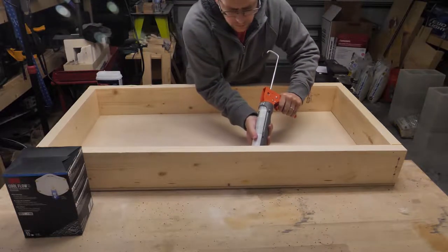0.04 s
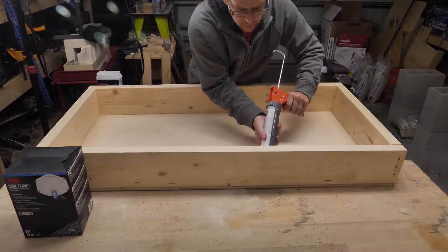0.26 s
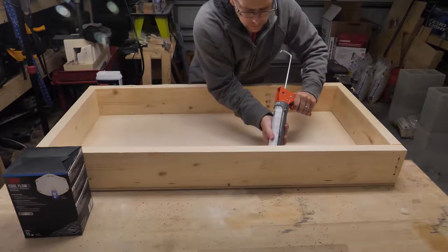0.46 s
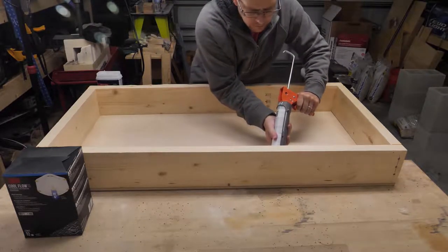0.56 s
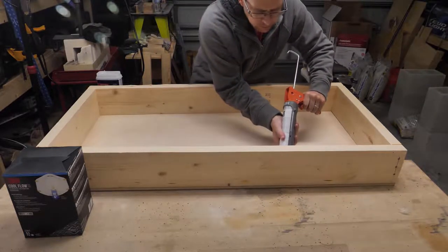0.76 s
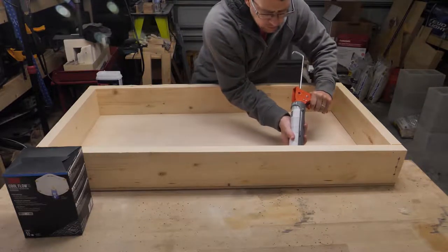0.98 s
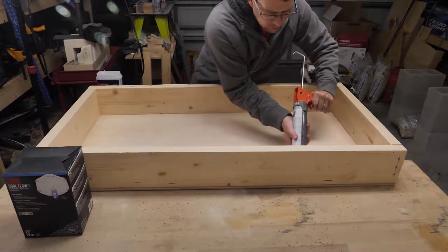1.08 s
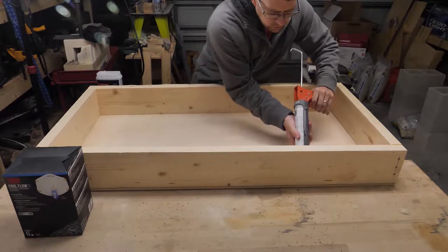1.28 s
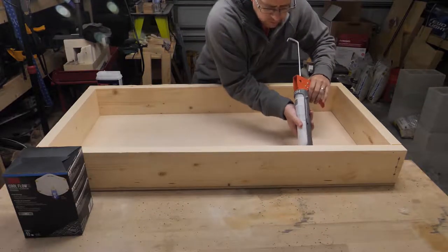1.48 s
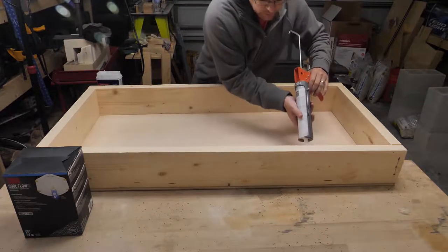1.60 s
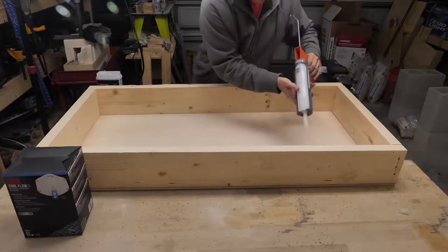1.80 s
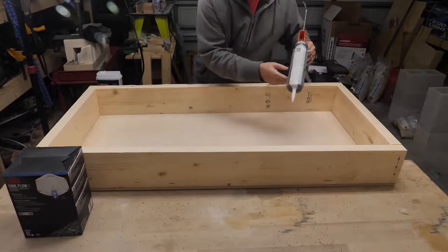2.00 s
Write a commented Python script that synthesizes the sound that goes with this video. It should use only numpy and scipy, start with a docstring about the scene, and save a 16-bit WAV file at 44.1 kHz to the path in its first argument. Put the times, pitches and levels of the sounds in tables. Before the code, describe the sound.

Sharp metal clicks from a caulking gun, with faint scraping on wood and soft knocks.

```python
"""A caulking gun lays a bead inside a wooden frame on a garage workbench. Over faint room noise the
nozzle drags along the wood by stick-slip friction. At 0.2 s the steel catch snaps, rings and rattles.
The nozzle snags on the grain, the boards groan once, and just after 1 s the trigger clacks back.
From 1.26 s the gun is lifted off with soft knocks and two spring ticks; the scraping fades, then
returns faintly at the end. The garage answers each sound with a short reverberation."""
import sys
import numpy as np
from scipy import signal
from scipy.fft import rfft, irfft, next_fast_len
from scipy.io import wavfile

SR = 44100
rng = np.random.default_rng(int(sys.argv[2]) if len(sys.argv) > 2 else 0)


def log_audio(samples):
    """Write samples as a 16-bit WAV file to the path given in sys.argv[1]."""
    # one column per channel
    frames = np.atleast_2d(samples).T
    # limit to full scale, then quantise
    limited = np.clip(frames, -1, 1)
    pcm = np.round(limited * 32767).astype(np.int16)
    wavfile.write(sys.argv[1], SR, pcm)


N = 90404
HIT_SAMPLES = 24000


def amp(db):
    """Amplitude ratio of a level in decibels."""
    return 10 ** (np.asarray(db) / 20)


def unit_rms(x):
    """Normalisation to unit mean power."""
    return x / np.sqrt(np.mean(x ** 2) + 1e-20)


def at_frequency(points, hz):
    """Interpolation on a logarithmic frequency axis."""
    f, value = np.transpose(points)
    return np.interp(np.log(hz + 1), np.log(f + 1), value)


def envelope(points):
    """Amplitude envelope, linear in decibels between points."""
    return amp(np.interp(np.arange(N) / SR, *np.transpose(points)))


def add(mix, start_s, sound):
    """Superposition of a delayed sound on the mix."""
    part = mix[round(start_s * SR):][:len(sound)]
    part += sound[:len(part)]


def colour(x, spectrum):
    """Linear filtering by multiplication of spectra."""
    size = next_fast_len(len(x) + 2048, True)
    gain = amp(at_frequency(spectrum, np.fft.rfftfreq(size, 1 / SR)))
    return irfft(rfft(x, size) * gain, size)[:len(x)]


def noise(spectrum, size=HIT_SAMPLES):
    """Filtered Gaussian noise of unit power."""
    return unit_rms(colour(rng.standard_normal(size), spectrum))


def decay(t60, hold_s=0):
    """Exponential damping: after a hold, a fall of 60 dB in t60 seconds."""
    return np.exp(-np.log(1000) * np.maximum(np.arange(HIT_SAMPLES) / SR - hold_s, 0) / t60)


# spectrum of the room noise (f/Hz, level/dB)
AIR_SPECTRUM = [(25, -22.5), (60, -24), (105, -5.5), (240, 1), (430, -12), (850, -16), (1300, -19),
                (1700, -16), (2500, -16), (5000, -21), (11500, -21.5), (15000, -29), (16000, -43.5)]
# stereo width of the room, as gain of the side signal (f/Hz, level/dB)
SIDE_SPECTRUM = [(100, -19.5), (300, -24), (700, -12), (1400, -4.5), (2600, -8), (5000, -4.5), (9500, -9.5),
                 (14000, -1)]
def air():
    """Stationary noise: low rumble and faint hiss, partly coherent between left and right."""
    mid = noise(AIR_SPECTRUM, N)
    side = colour(noise(AIR_SPECTRUM, N), SIDE_SPECTRUM)
    return amp(-60.5) * np.array([mid + side, mid - side])


def slips(spectrum, per_second=1400, spread_db=3):
    """Stick-slip friction: random impulses of uneven size, filtered by what they shake."""
    strength = amp(spread_db * np.minimum(rng.exponential(1, N), 3.5))
    sign = rng.choice([-1, 1], N)
    slipping = rng.random(N) < per_second / SR
    return unit_rms(colour(strength * sign * slipping, spectrum))


# hollow rubbing of the nozzle on the boards: envelope (t/s, level/dB), spectrum (f/Hz, level/dB)
RUB_ENVELOPE = [(0, -49.5), (.3, -48.5), (.52, -48), (.65, -51), (.8, -47), (.9, -44.5), (1.0, -45),
                (1.07, -55), (1.2, -55), (1.3, -62), (1.39, -58), (1.52, -65.5), (1.68, -73), (1.9, -72),
                (2.05, -61.5)]
RUB_SPECTRUM = [(60, -37), (100, -7), (150, -7.5), (200, -10.5), (290, -2.5), (350, 1), (450, 0.5),
                (545, -6), (630, 1), (725, 0), (810, -8), (910, -1), (1060, -16.5), (1400, -15),
                (2500, -28.5), (6000, -43)]
# gritty scraping of gun and hands: envelope (t/s, level/dB), spectrum (f/Hz, level/dB)
GRIT_ENVELOPE = [(0, -55), (.2, -58), (.5, -54), (.65, -60.5), (.8, -52.5), (.9, -52.5), (1.0, -50.5),
                 (1.15, -55.5), (1.24, -60), (1.29, -52), (1.34, -58.5), (1.42, -52.5), (1.56, -64.5),
                 (1.66, -79), (1.77, -63.5), (1.87, -76.5), (1.98, -61.5), (2.05, -60)]
GRIT_SPECTRUM = [(60, -34.5), (200, -15), (800, -6), (1400, 4), (1850, -5.5), (2250, -1), (3200, -7.5),
                 (4500, -10), (6500, -22.5), (14000, -20.5), (16000, -40)]
def scraping():
    """Sliding friction: dense slips merge into a hollow rub and a brighter grit."""
    rub = envelope(RUB_ENVELOPE) * slips(RUB_SPECTRUM)
    grit = envelope(GRIT_ENVELOPE) * slips(GRIT_SPECTRUM)
    return rub + grit


def damped_mode(hz, db, t60, linewidth_hz=18.7):
    """Free vibration: the phase wanders as the loose part shifts on its seat, broadening the line."""
    drift = np.cumsum(rng.standard_normal(HIT_SAMPLES)) * np.sqrt(2 * np.pi * linewidth_hz / SR)
    cycles = hz * np.arange(HIT_SAMPLES) / SR + rng.random()
    return amp(db) * decay(t60) * np.sin(2 * np.pi * cycles + drift)


def steel_impact(contacts, modes, spectrum, crack_db, crack_t60, rattle_db, rattle_hold_s, rattle_t60):
    """Impact excitation: each contact cracks and rings the modes; the last leaves a loose rattle."""
    out = np.zeros(N)
    for start_s, db in contacts:
        ring = sum(damped_mode(*mode) for mode in modes)
        crack = amp(crack_db) * noise(spectrum) * decay(crack_t60)
        add(out, start_s, amp(db) * (ring + crack))
    rattle = amp(rattle_db) * noise(spectrum) * decay(rattle_t60, rattle_hold_s)
    add(out, contacts[-1][0], rattle)
    return out


# contacts of the catch plate with the rod (t/s, level/dB)
CATCH_CONTACTS = [(.2083, 0.5), (.2094, -2), (.2124, -3.5)]
# normal modes of plate and rod (f/Hz, level/dB, T60/s)
CATCH_MODES = [(2230, -28, .02), (2610, -28.5, 0.022), (2800, -38, 0.18), (3620, -38.5, 0.29),
               (3675, -37.5, 0.19), (6019, -55, 0.31), (6340, -41, .45), (8300, -24, .025),
               (8480, -36, .25), (9318, -20.5, 0.02), (9580, -31, 0.22), (9841, -36.5, .32),
               (10010, -12.5, 0.024), (11870, -24.5, 0.022), (13600, -27, .025)]
# spectrum of their crack and rattle (f/Hz, level/dB)
CATCH_SPECTRUM = [(60, -50), (900, -33), (1250, -10.5), (1900, -9.5), (2300, 0), (3200, -2.5), (3700, 1.5),
                  (4400, -5), (6100, 3.5), (7100, -5.5), (8300, 3), (8950, -10), (9750, 12), (10500, -3.5),
                  (13000, -1.5), (16000, -7.5)]
def catch():
    """Impact with rebound: the catch plate snaps on the rod and excites inharmonic modes."""
    return steel_impact(CATCH_CONTACTS, CATCH_MODES, CATCH_SPECTRUM, crack_db=-14.5, crack_t60=0.015,
                        rattle_db=-31.5, rattle_hold_s=0.063, rattle_t60=0.16)


# snags of the nozzle (t/s, level/dB) and their spectrum (f/Hz, level/dB)
SNAGS = [(0.5362, -41), (.6148, -45), (.6428, -46), (0.6949, -41.5), (.7186, -51), (0.757, -41),
         (.7984, -47), (0.846, -40)]
SNAG_SPECTRUM = [(200, -24), (900, 6), (1500, 5), (2300, 0), (3200, -22), (5000, -20), (8000, -30),
                 (16000, -46)]
def snags():
    """Friction transients: the nozzle catches on the grain in heavily damped bursts."""
    out = np.zeros(N)
    for start_s, db in SNAGS:
        add(out, start_s, amp(db) * noise(SNAG_SPECTRUM) * decay(t60=0.023))
    return out


# narrow response of the boards (f/Hz, level/dB)
GROAN_SPECTRUM = [(130, -55), (205, -23), (260, 9), (315, -6), (520, -52)]
def groan(peak_s=0.965, half_width_s=0.042):
    """Resonance: the boards groan under the nozzle in one swell of low narrow-band noise."""
    swell = np.exp(-((np.arange(N) / SR - peak_s) / half_width_s) ** 2)
    return amp(-44.5) * swell * noise(GROAN_SPECTRUM, N)


# contacts of the trigger with its frame (t/s, level/dB)
TRIGGER_CONTACTS = [(1.0421, 0), (1.0434, -2.5), (1.0462, -3.5)]
# normal modes of trigger and frame (f/Hz, level/dB, T60/s)
TRIGGER_MODES = [(671.2, -43.5, 0.47), (2560, -28, 0.033), (2616, -46, 0.23), (3300, -61, 0.16),
                 (5500, -55, 0.027), (8680, -30, 0.036), (8680, -42, .09), (10560, -25.5, 0.025),
                 (10500, -44, 0.12), (12460, -20.5, .026), (12300, -45, .13), (13530, -30, 0.02),
                 (13600, -30, .03)]
# spectrum of their crack and rattle (f/Hz, level/dB)
TRIGGER_SPECTRUM = [(60, -37), (150, -9), (260, -6.5), (700, 5.5), (1200, -0.5), (1700, -2), (2600, 2.5),
                    (3400, 1.5), (5200, 2.5), (6200, -4), (8000, -4), (9400, -7), (10400, 7), (11400, 2),
                    (14000, 4.5), (15200, 1), (16000, -30)]
def trigger():
    """Impact with rebound: the trigger clacks back, and its lowest, least damped mode rings longest."""
    return steel_impact(TRIGGER_CONTACTS, TRIGGER_MODES, TRIGGER_SPECTRUM, crack_db=-21.5,
                        crack_t60=0.02, rattle_db=-38.5, rattle_hold_s=0.005, rattle_t60=0.22)


# knocks of the tube (t/s, level/dB, T60/s, rise time/s, treble gain/dB), spectrum (f/Hz, level/dB)
KNOCKS = [(1.26, -52.5, 0.16, 0.011, -2), (1.288, -44.5, .055, 0.0068, -0.5), (1.425, -42, 0.15, 0.011, 4),
          (1.436, -49, .06, .005, 1), (1.4438, -33, 0.047, 0.00045, 1), (1.449, -37, 0.067, .001, -9),
          (1.489, -53, 0.038, .002, 1), (1.577, -48.5, 0.027, .002, 3)]
KNOCK_SPECTRUM = [(100, -26), (500, -9.5), (950, -12), (1400, -0.5), (1780, -0.5), (2400, -1), (3000, -9.5),
                  (3600, -5.5), (4100, -10.5), (4800, -11.5), (6300, -23.5), (9700, -16), (12500, -25.5),
                  (14600, -15), (16000, -38)]
def tube_knocks(shelf_hz=5000):
    """Soft impact: the tube meets its cradle with a gradual onset and a dull, damped response."""
    out = np.zeros(N)
    t = np.arange(HIT_SAMPLES) / SR
    for start_s, db, t60, rise_s, treble_db in KNOCKS:
        body = colour(noise(KNOCK_SPECTRUM), [(shelf_hz / 2, 0), (shelf_hz * 2, treble_db)])
        attack = np.minimum(t / rise_s, 1)
        add(out, start_s, amp(db) * body * attack * decay(t60, hold_s=rise_s))
    return out


# ticks of the spring (t/s, level/dB) and their spectrum (f/Hz, level/dB)
SPRING_TICKS = [(1.363, -50.5), (1.369, -50.5)]
SPRING_SPECTRUM = [(3000, -27), (6000, -12), (7500, -3), (11000, -6), (14500, 0), (16000, -15)]
def spring_ticks():
    """Elastic release: the spring gives faint, bright transients as the grip relaxes."""
    out = np.zeros(N)
    for start_s, db in SPRING_TICKS:
        add(out, start_s, amp(db) * noise(SPRING_SPECTRUM) * decay(t60=0.025))
    return out


# reverberation time of the garage (f/Hz, T60/s)
REVERB_TIMES = [(150, 0.35), (1000, .5), (3000, .5), (6000, 0.43), (10000, 0.33), (15000, 0.2)]
def diffuse_tail(onset_s=0.0044):
    """Diffuse field: dense reflections of unit total energy, each band decaying at its own rate."""
    hz, t, bands = signal.stft(rng.standard_normal(HIT_SAMPLES), SR, nperseg=256)
    damping = np.exp(-np.log(1000) * t / at_frequency(REVERB_TIMES, hz)[:, None])
    tail = signal.istft(bands * damping, SR, nperseg=256)[1][:HIT_SAMPLES]
    tail *= np.clip(np.arange(HIT_SAMPLES) / SR / onset_s - 0.5, 0, 1)
    return tail / np.linalg.norm(tail)


def garage(direct, wet_db):
    """Convolution: early bench reflections and the diffuse field spread the sound in stereo."""
    bench = rng.standard_normal(HIT_SAMPLES) * decay(t60=0.004)
    bench *= amp(-5.5) / np.linalg.norm(bench)
    mid = amp(wet_db) * diffuse_tail()
    side = colour(amp(wet_db) * diffuse_tail() + bench, SIDE_SPECTRUM)
    response = np.array([mid + side, mid - side])
    return direct + signal.fftconvolve(direct[None], response, axes=1)[:, :N]


def scene():
    """Superposition: the room noise and each source with its reverberation."""
    snap = garage(catch(), wet_db=-2.5)
    clack = garage(trigger(), wet_db=-2)
    lift_off = garage(tube_knocks() + spring_ticks(), wet_db=-4)
    nozzle_wet_db = -3
    nozzle = garage(scraping() + snags() + groan(), nozzle_wet_db)
    nozzle /= np.hypot(1, amp(nozzle_wet_db))  # offsets the power added by the diffuse field
    return air() + nozzle + snap + clack + lift_off


def record(dry):
    """Band limiting: filters pass 63 Hz to 16.1 kHz."""
    high_pass = signal.butter(3, 63, "high", fs=SR, output="sos")
    low_pass = signal.firwin(255, 16100, window=("kaiser", 9), fs=SR)
    return signal.oaconvolve(signal.sosfilt(high_pass, dry), low_pass[None], "same")


dry = scene()
out = record(dry)
log_audio(out)
```